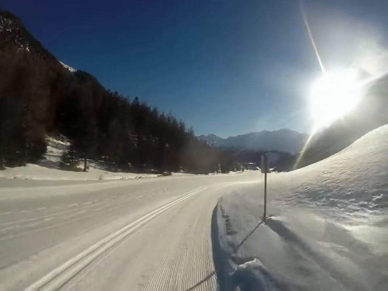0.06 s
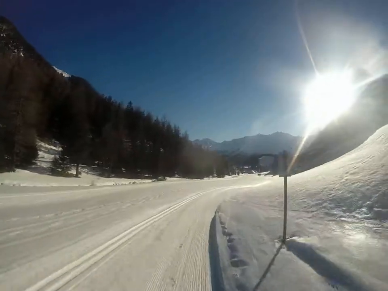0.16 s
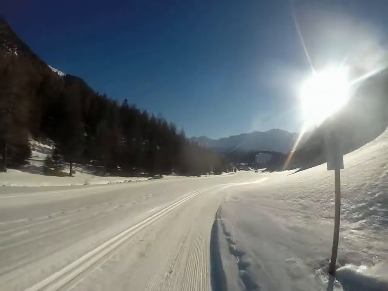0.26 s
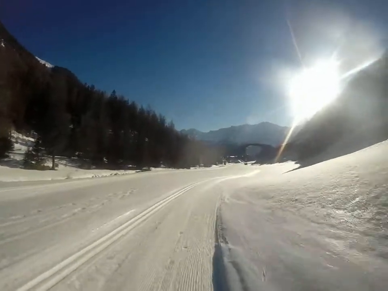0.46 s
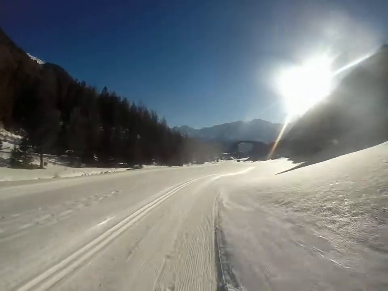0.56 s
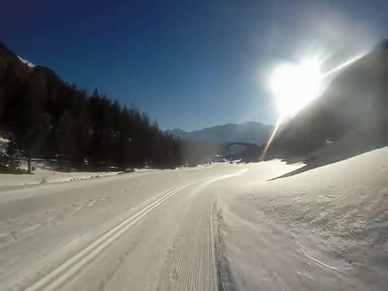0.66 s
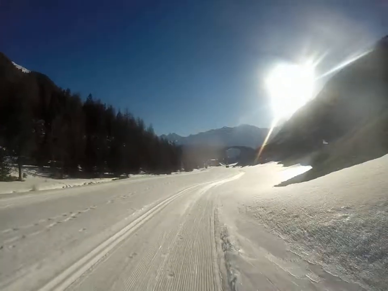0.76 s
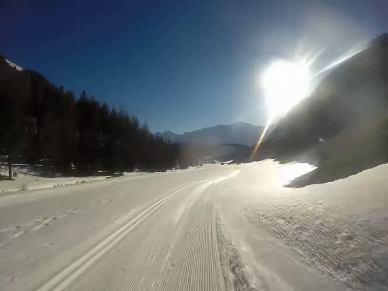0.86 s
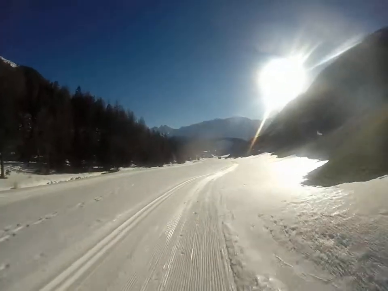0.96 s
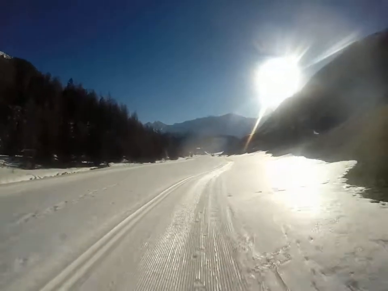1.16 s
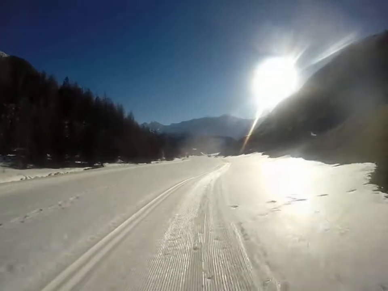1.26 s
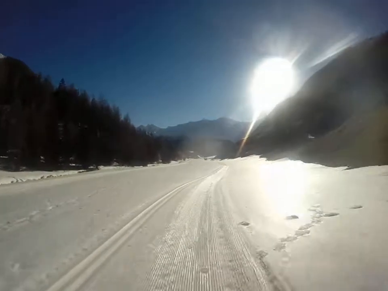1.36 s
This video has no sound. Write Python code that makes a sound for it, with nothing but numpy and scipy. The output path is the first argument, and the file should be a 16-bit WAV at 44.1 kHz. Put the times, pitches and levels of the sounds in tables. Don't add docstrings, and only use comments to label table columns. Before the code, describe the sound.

A continuous gritty ski glide grows heavier midway and then eases, broken by crust crunches and hissing powder. Dull rumble and wind thumps come through a boxy, sealed camera microphone outdoors.

```python
import sys
import numpy as np
from scipy import signal
from scipy.fft import rfft, irfft
from scipy.io import wavfile
from scipy.ndimage import uniform_filter1d

SR = 44100
rng = np.random.default_rng(int(sys.argv[2]) if len(sys.argv) > 2 else 0)


def attenuation_scalar(level_db):
    decades = np.asarray(level_db, float) / 20
    return 10 ** decades


def store_pcm(level_fs):
    pcm = np.round(np.clip(level_fs, -1, 1) * 32767).astype(np.int16)
    wavfile.write(sys.argv[1], SR, np.atleast_2d(pcm).T)


N = 61739
T = np.arange(N) / SR


def rms_one(x):
    return x / np.sqrt(np.mean(x ** 2) + 1e-20)


def drift(rate_hz):
    step = 40
    pole = np.exp(-2 * np.pi * step * rate_hz / SR)
    settle = 2000
    noise = rng.standard_normal(N // step + settle + 2)
    slow = signal.lfilter([1], [1, -2 * pole, pole * pole], noise)[settle:]
    return np.interp(np.arange(N) / step, np.arange(len(slow)), rms_one(slow))


def coloured(spectrum, patchy_db):
    hz = np.fft.rfftfreq(N, 1 / SR) + 1
    knots_hz, knots_db = np.transpose(spectrum)
    octaves_outside = np.maximum(np.log2(knots_hz[0] / hz), np.log2(hz / knots_hz[-1]))
    level_db = np.interp(np.log(hz), np.log(knots_hz), knots_db) - 14 * np.maximum(0, octaves_outside)
    noise = irfft(rfft(rng.standard_normal(N)) * attenuation_scalar(level_db), N)
    return rms_one(noise) * attenuation_scalar(patchy_db * drift(15))


def evened(x, share):
    return rms_one(x / uniform_filter1d(x ** 2, size=700) ** (share / 2))


def housing(drive, resonances, edges_hz, patchy_db):
    modes = 0
    for k, (hz, width_hz, db) in enumerate(resonances):
        r = np.exp(-np.pi * width_hz / SR)
        polarity = (-1) ** k
        push = drive * attenuation_scalar(db + patchy_db * drift(10.5)) * polarity
        zeros = [(1 - r * r) / 2, 0, (r * r - 1) / 2]
        poles = [1, -2 * r * np.cos(2 * np.pi * hz / SR), r * r]
        modes = modes + signal.lfilter(zeros, poles, push)
    band = signal.butter(4, edges_hz, "band", fs=SR, output="sos")
    return evened(signal.sosfilt(band, modes), share=0.7)


# (time [s], level [dB])
GLIDE_LOAD = [
    (0.0, -48.5),
    (0.306, -47),
    (0.88, -45),
    (1.21, -48.5),
    (1.4, -48),
]
# (frequency [Hz], width [Hz], level [dB])
CASE_LOW = [(1442.5, 93, 1), (1823, 170, -1), (2233, 242, 2.5), (2810, 380, -5), (3160, 180, 1),
            (3686, 264, -0.5)]
CASE_HIGH = [(4820, 580, -9), (5730, 334, 0.5), (5852, 600, -1.5), (7150, 440, -17)]
CASE_TOP = [(4313, 310, 6.5), (8210, 190, 0.5)]
# (lower edge [Hz], upper edge [Hz])
LOW_EDGES = [1340, 3440]
HIGH_EDGES = [4540, 8570]
TOP_EDGES = [3900, 8670]
# (frequency [Hz], density [dB per Hz])
RUMBLE = [(53, -25), (90, -0.5), (152, -8.5), (460, -16), (636, -20), (1030, -21), (1300, -21), (1690, -58),
          (2860, -120)]


def glide():
    load_db = np.interp(T, *np.transpose(GLIDE_LOAD))
    rub = rng.standard_normal(N) * attenuation_scalar(1.3 * drift(35))
    case = housing(rub, CASE_LOW, LOW_EDGES, patchy_db=1.65)
    case = case + attenuation_scalar(-4) * housing(rub, CASE_HIGH, HIGH_EDGES, patchy_db=0.6)
    case = case + attenuation_scalar(-7) * housing(rub, CASE_TOP, TOP_EDGES, patchy_db=2.0)
    rumble_db = -52 + 0.64 * (load_db - load_db.mean())
    return attenuation_scalar(load_db) * case + attenuation_scalar(rumble_db) * coloured(RUMBLE, patchy_db=1.05)


def grains():
    grains_per_s, spread_db, flutter_db = 7000, 3, 0.5
    sizes = attenuation_scalar(spread_db * np.minimum(rng.exponential(1, N), 4)) * rng.choice([-1, 1], N)
    breaks = rms_one((rng.random(N) < grains_per_s / SR) * sizes)
    return (breaks + 0.38 * rng.standard_normal(N)) * attenuation_scalar(flutter_db * drift(49))


# (time [s], length [s], level [dB], upper resonances [dB], deepest resonances [dB])
CRUNCHES = [(.006, 0.032, -46, 2, 1.5), (0.029, 0.065, -46, -2.5, -1), (.202, 0.028, -40, -0.5, -2.5),
            (0.239, 0.016, -45, -0.5, 4), (0.302, 0.013, -47, 0, -2), (.332, .022, -47, 2, -1),
            (.356, .011, -39, -6, -1), (.39, .09, -49, -5, -2), (.538, .010, -41, 5, -2),
            (.552, .017, -43, 1, -2), (0.608, 0.019, -41, -1.5, -0.5), (0.633, 0.028, -51, 5, 7),
            (.695, 0.066, -43.5, -0.5, -0.5), (0.771, 0.047, -41, -4, 3), (0.826, 0.0084, -37, -22, 4),
            (.843, 0.11, -39.5, -4.5, 3), (0.974, 0.048, -42, -3, 3.5), (1.026, 0.014, -46.5, -5, 3),
            (1.037, 0.1, -47, -2, -14), (1.137, 0.039, -45.5, -0.5, -12), (1.181, 0.029, -44.5, 1, -8),
            (1.333, 0.024, -49, -21, 2.5)]
# (frequency [Hz], width [Hz], level [dB])
CRUST_HIGH = [(4820, 580, -2.5), (5430, 215, 0), (5920, 330, 2), (6920, 240, -6)]


def crunch():
    attack_s, release_s, sag_db_per_s = 0.001, 0.003, -35
    low, high, deep = np.zeros((3, N))
    for start, length, db, upper_db, deep_db in CRUNCHES:
        since = T - start
        shape = np.clip(since / attack_s, 0, 1) * np.exp(-np.maximum(0, since - length) / release_s)
        shape = shape * attenuation_scalar(db + sag_db_per_s * np.clip(since, 0, length))
        low = np.maximum(low, shape)
        high = np.maximum(high, shape * attenuation_scalar(upper_db))
        deep = np.maximum(deep, shape * attenuation_scalar(deep_db - 5))
    body = grains()
    deep_part = deep * housing(body, CASE_LOW[:2], LOW_EDGES, patchy_db=-0.1)
    low_part = low * housing(body, CASE_LOW[2:], LOW_EDGES, patchy_db=0.5)
    high_part = high * housing(grains(), CRUST_HIGH, HIGH_EDGES, patchy_db=3.2)
    return deep_part + low_part + high_part


# (time [s], level [dB], 60 dB decay time [s])
SPRAYS = [
    (.047, -49.5, 1),
    (0.326, -51.5, 0.84),
    (.42, -55, 0.41),
    (.668, -47.5, 0.95),
    (.87, -65, 0.86),
    (1.008, -49.5, 1),
    (1.1, -57.5, 1),
    (1.185, -70, 0.32),
    (1.33, -60, .5),
]
# (frequency [Hz], density [dB per Hz])
SPRAY = [(4120, -38), (7000, -20), (7210, -7), (8370, 8.5), (8670, 3), (12300, -2), (15200, -19)]
HISS = [(4410, -9), (7500, -1), (9220, -6.5), (9960, -6.5), (12700, -7), (15200, -21)]


def spray():
    level = np.zeros(N)
    for start, db, t60 in SPRAYS:
        since = T - start
        level += np.clip(since / 0.0011, 0, 1) * attenuation_scalar(db - 60 * np.maximum(since, 0) / t60)
    return level * coloured(SPRAY, patchy_db=0.6) + attenuation_scalar(-52.5) * coloured(HISS, patchy_db=0.3)


# (centre time [s], peak level [dB], frequency [Hz], half length [s])
BUFFETS = [(0.072, -34, 41.7, 0.063), (0.13, -24, 38.5, 0.017), (0.188, -21.5, 25.5, 0.041),
           (0.266, -37.5, 31.8, 0.023), (0.3, -30, 46.4, 0.037), (.364, -12, 39.2, 0.015),
           (0.396, -22.5, 42.6, 0.018), (0.448, -31, 26, 0.012), (0.491, -30.5, 26.3, 0.021),
           (0.589, -33.5, 27.1, 0.046), (0.684, -33, 46.6, 0.0081), (0.716, -27.5, 46.2, 0.015),
           (0.745, -30, 41.5, 0.017), (0.785, -25, 40.8, 0.017), (.818, -21, 30.3, 0.023),
           (0.882, -27.5, 35.2, 0.017), (1.047, -21, 40, .022), (1.083, -24, 42, .016),
           (1.124, -27, 27, .018), (1.193, -35, 32, .025), (1.289, -38, 41, 0.057),
           (1.371, -37, 47.5, 0.056)]
# (frequency [Hz], density [dB per Hz])
WIND = [(12, -22), (20, 0), (54, -3), (130, -25.5), (170, -55), (290, -120)]


def wind():
    lag = 0.21
    pushes = np.zeros(N)
    for centre, db, hz, half in BUFFETS:
        since = T - centre
        swell = np.exp(-(since / half - lag) ** 2)
        pushes -= attenuation_scalar(db) * swell * np.cos(2 * np.pi * hz * since)
    return pushes + attenuation_scalar(-42.5) * coloured(WIND, patchy_db=0.8)


def scene():
    return (glide() + crunch() + spray() + wind())[None]


def band_limit(x):
    return signal.sosfilt(signal.butter(12, 15340, fs=SR, output="sos"), x)


def record(dry):
    port = signal.butter(2, 14200, fs=SR, output="sos")
    mix = signal.sosfilt(port, dry)
    return band_limit(mix)


dry = scene()
out = record(dry)
store_pcm(out)
```